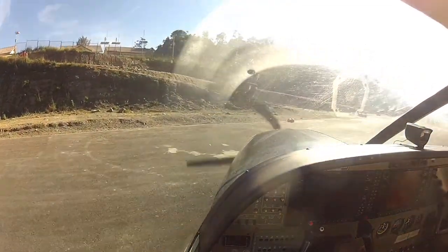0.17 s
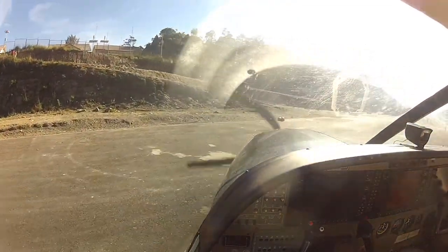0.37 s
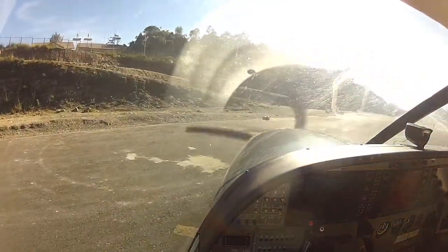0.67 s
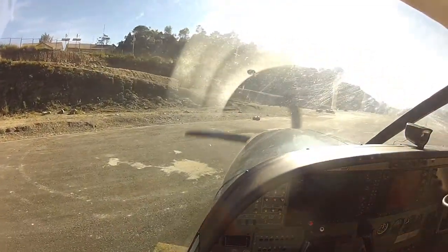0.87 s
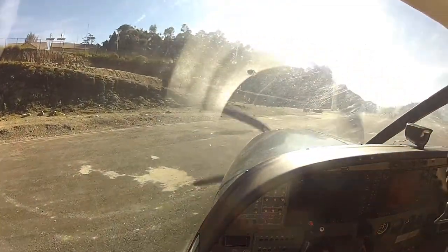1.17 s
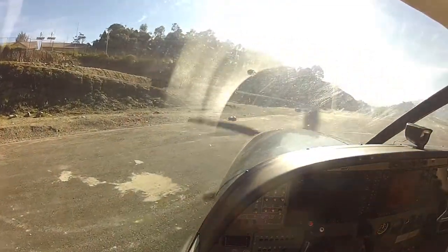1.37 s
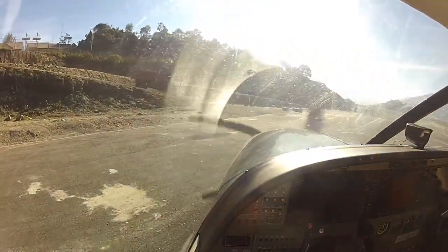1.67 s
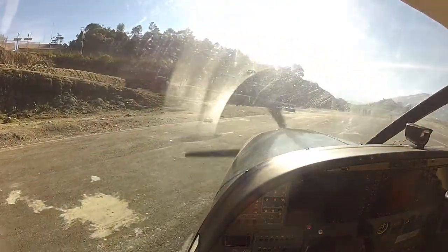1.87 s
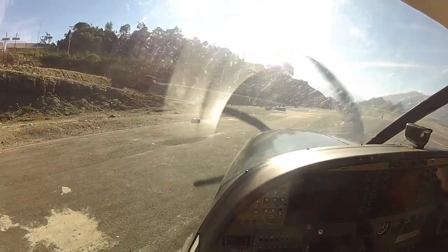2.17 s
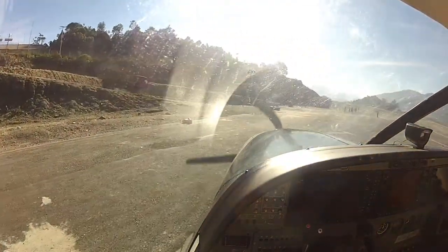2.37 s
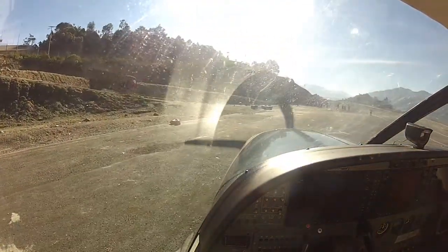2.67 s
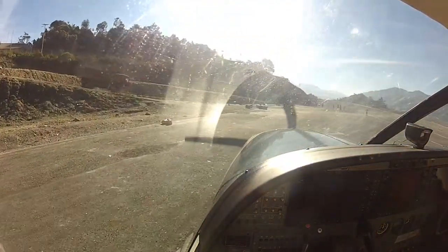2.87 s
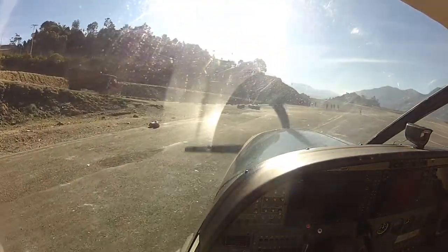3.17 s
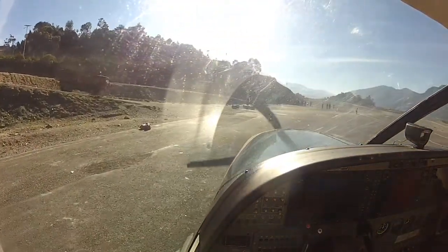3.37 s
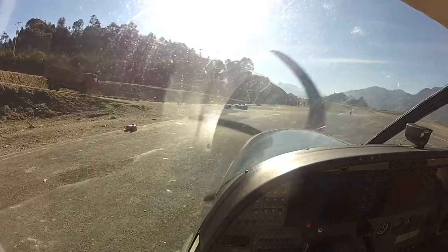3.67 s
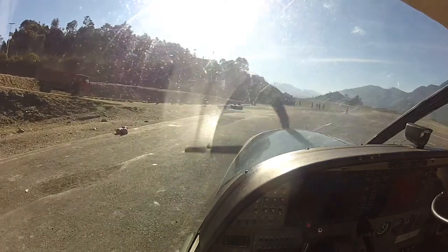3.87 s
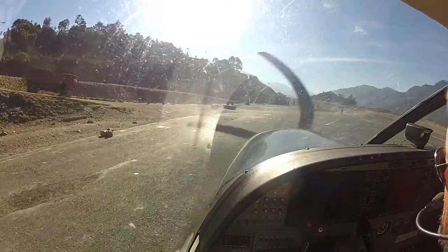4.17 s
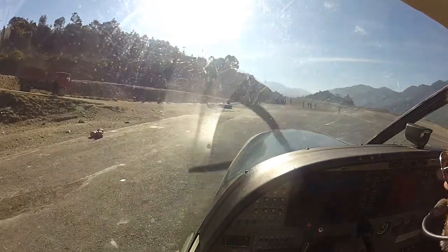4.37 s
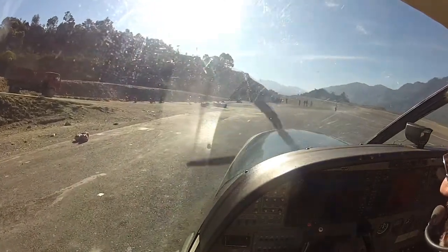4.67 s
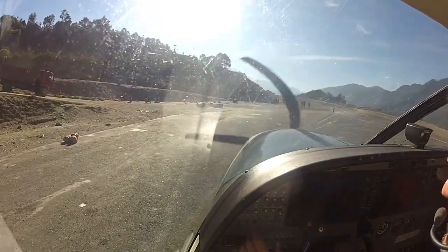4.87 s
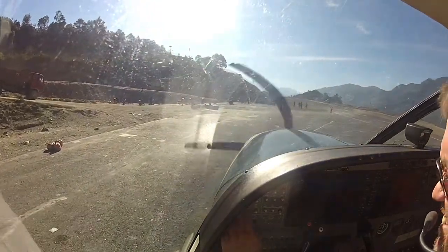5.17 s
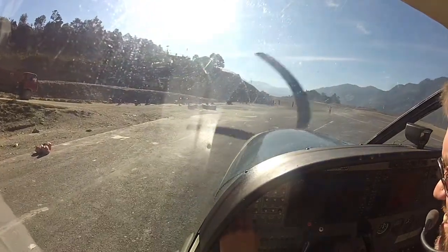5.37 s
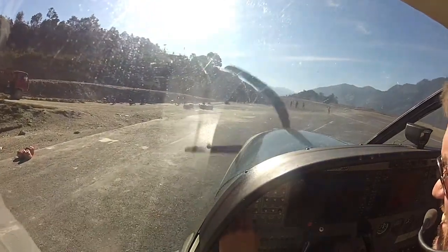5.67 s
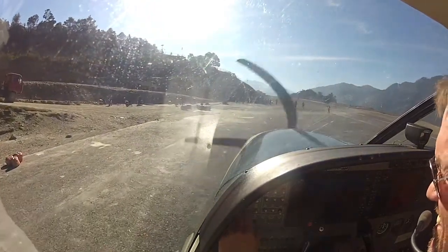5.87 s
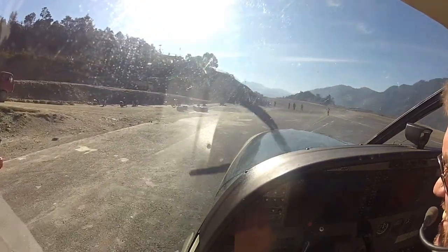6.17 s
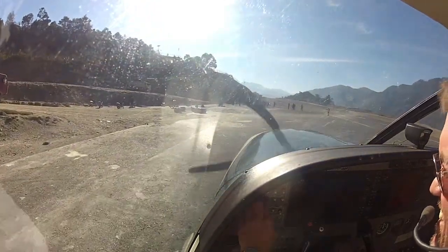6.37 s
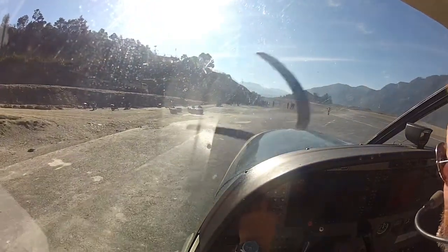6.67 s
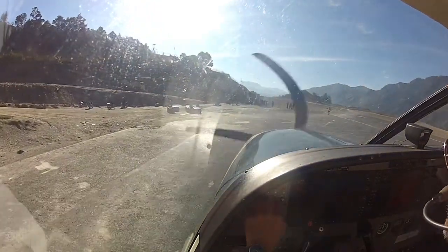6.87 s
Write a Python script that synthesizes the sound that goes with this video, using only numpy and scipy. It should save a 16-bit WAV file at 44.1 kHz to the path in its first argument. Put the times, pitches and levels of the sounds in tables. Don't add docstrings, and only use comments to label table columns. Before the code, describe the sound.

Turboprop engine heard from the cockpit: nasal whine and low beating thrum sink in pitch as power comes off, with roar continuing and faint panel ticks.

```python
import sys
import numpy as np
from scipy import signal
from scipy.io import wavfile
from scipy.ndimage import uniform_filter1d

SR = 44100
rng = np.random.default_rng(int(sys.argv[2]) if len(sys.argv) > 2 else 0)


def bounce(signal):
    frames = np.transpose(np.atleast_2d(signal))
    limited = np.clip(frames, -1, 1)
    pcm = np.round(limited * 32767).astype(np.int16)
    wavfile.write(sys.argv[1], SR, pcm)


def invert_db(level):
    return 10 ** (np.asarray(level, dtype=float) / 20)


N = 309582

# start_s, gear_mesh_hz, gas_generator_shaft_hz
ENGINE_SPEED = [(0, 2057.0, 395.05), (0.4, 2053.1, 394.9), (0.8, 2047.5, 394.89), (1.1, 2040.1, 391.93),
                (1.4, 2019.4, 383.62), (1.7, 1993.1, 376.19), (2, 1967.8, 369.55), (2.4, 1934.8, 362.01),
                (2.8, 1903.6, 356.13), (3.2, 1874.4, 351.75), (3.6, 1849.9, 348.6), (4, 1828.2, 346.67),
                (4.5, 1804.9, 345.17), (5, 1783.6, 344.27), (5.5, 1766.5, 343.67), (6, 1752.8, 343.26),
                (6.5, 1741.0, 343.09), (7.02, 1733.8, 343.15)]


def evened(x):
    return x / np.sqrt(np.mean(x ** 2))


def curves(rows, at):
    first, *columns = np.transpose(rows)
    return [np.interp(at, first, column) for column in columns]


def drift(rate_hz):
    steps = rng.standard_normal(N // 100 + 40)
    smooth = signal.filtfilt(*signal.butter(2, rate_hz, fs=SR / 100), steps)
    return np.interp(np.arange(N) / 100, np.arange(len(steps)), evened(smooth))


def turns_of(hz):
    return np.cumsum(hz) / SR


def tone(turns, db, waver_db, waver_turns, waver_hz=4.8):
    level = np.sqrt(2) * invert_db(db + waver_db * drift(waver_hz))
    return level * np.cos(2 * np.pi * (turns + waver_turns * drift(7.8)))


def swell_db(hz, resonances):
    power = 0
    for centre_hz, width_hz, db in resonances:
        power = power + invert_db(db) ** 2 / (1 + (2 * (hz - centre_hz) / width_hz) ** 2) ** 2
    return 10 * np.log10(power)


def loose_fittings():
    # start_s, peak_db
    knock_times = [
        (0.1276, -62),
        (1.1333, -44.5),
        (2.4882, -61),
        (5.0694, -55),
        (6.5216, -55),
        (6.5344, -57),
    ]
    # pitch_hz, level_db, decay_t60_s
    panel_modes = [(2890, 0, .03), (4550, 0, .025), (4830, 2.5, .02), (5080, -5, .02), (5370, 4, .015),
                   (5700, 0, .012)]
    rattles = rng.random(N) < 9 / SR
    knocks = rattles * invert_db(-73 + 3.0 * np.minimum(rng.exponential(1, N), 2.5))
    rebounds_s, rebound_loss_db = (0, .0037, .0088, .0165), np.array([2, 9, 10, 13])
    for start_s, db in knock_times:
        hits = [round((start_s + later) * SR) for later in rebounds_s]
        knocks[hits] = invert_db(db - rebound_loss_db)
    t = np.arange(3000) / SR
    ring = sum(invert_db(db - 60 * t / t60) * np.sin(2 * np.pi * hz * t) for hz, db, t60 in panel_modes)
    return signal.oaconvolve(knocks, ring)[:N]


def engine_mount():
    return tone(21.5 * np.arange(N) / SR, -53.5, 2, 0.015, 3.5)


def accessory_hum(mesh_hz):
    load = (mesh_hz - mesh_hz.min()) / np.ptp(mesh_hz)
    hum_hz = 75.6 - 2.6 * load
    return tone(turns_of(hum_hz), -50.5 - 3.5 * load, 0.98, 0.054)


def gas_generator(shaft_hz):
    shaft_orders = [1, 2, 4, .2928, 1.86, 3.135, 3.832]
    # centre_hz, width_hz, level_db
    shaft_swells = [
        [(395, 6, -53.5), (367, 40, -54.5), (344, 18, -50)],
        [(790, 10, -61), (725, 34, -50.5)],
        [(1580, 14, -57), (1470, 200, -64), (1378, 40, -48.5)],
        [(110.3, 8, -48.5), (105.1, 9.5, -52.5)],
        [(735, 5, -50)],
        [(1238, 30, -57), (1067, 98, -56)],
        [(1333, 50, -56)],
    ]
    # centre_hz, width_hz, level_db
    compressor_swells = [(5800, 120, -72), (5665, 140, -67.5), (5553, 83, -69.5), (5480, 40, -80)]
    turns = turns_of(shaft_hz)
    out = np.zeros(N)
    for order, swells in zip(shaft_orders, shaft_swells):
        out += tone(order * turns, swell_db(order * shaft_hz, swells), 1.0, 0.013, 3.1)
    blade_order = 15.966
    blade_db = swell_db(blade_order * shaft_hz, compressor_swells)
    return out + tone(blade_order * turns, blade_db, 1.8, .35)


def buffet(x, patchy_db=1.02, flicker_db=0.12, above_hz=1500):
    hz, _, z = signal.stft(x, SR, nperseg=512, noverlap=384)
    patches = rng.standard_normal(z.shape[::-1]).T
    flicker = evened(uniform_filter1d(patches.mean(0), size=6))
    patches = uniform_filter1d(patches, size=5, axis=0)
    patches = evened(uniform_filter1d(patches, size=16, axis=1))
    share = (hz ** 2 / (hz ** 2 + above_hz ** 2))[:, None]
    gain = invert_db(share * (patchy_db * patches + flicker_db * flicker))
    return signal.istft(z * gain, nperseg=512, noverlap=384)[1][:N]


def roar(size=8192):
    # centre_hz,
    # width_hz, idle_level_db, change_at_power_db
    cabin_and_housing = [(111, 33, -4.5, -4), (130.5, 28, -9.5, 7), (184, 51, 0.2, -2.5), (191.2, 42, 0.96, 2.5),
                         (232.6, 31, 0, -4), (253.6, 36.6, 4, -0.8), (290, 76, -7.5, 3), (336, 33, -4.5, -1.5),
                         (411, 90, -10, 2.5), (458.4, 55, -9, 1.8), (501, 38, -10.5, -6), (564, 112, -14.5, 2.5),
                         (734, 82, -10.5, 0.5), (796, 40.0, -22.5, 7.5), (920, 78, -20.5, 3.5), (1039.0, 40, -15.5, -6),
                         (1072, 48, -10.5, 2), (1142, 73, -7.5, 3.5), (1227, 72, -2, 2), (1264, 80, -3.5, 3.5),
                         (1394, 170, -14.5, 1.5), (1571, 120, -15.5, 0), (1643, 52, -17.5, 2), (1783, 96, -11, 0.3),
                         (1888, 95, -9, -3), (1985, 62, -5, -1),
                         (2082, 125, -9.5, 0.5), (2137, 160, -4, -13), (2253, 61, 1.6, -4), (2320, 42, -5, 1.5),
                           (2352, 92, -1.5, -7), (2440, 31, -1, -6), (2506, 75, -5.5, -7.5), (2620, 105.0, -21, -1),
                           (2625, 93, -14.5, -4.5), (2770, 63, -19, -11), (2830, 81, -20.5, -7),
                           (2995, 117.0, -25.5, -1.7), (3020, 42, -23.5, -11), (3165, 113, -18.5, -5),
                           (3300, 80, -21.5, 5), (3310, 79, -19.5, -8.5), (3370, 102.0, -22.5, -5), (3522, 51, -16, 2),
                           (3610, 150, -19, 3), (3761, 118, -8.5, 5.5), (3860, 154, -16.5, 3), (4000, 190, -22.5, 5),
                           (4310, 293.0, -31.5, 2), (4465, 380, -32.5, 1), (4760, 170, -37, 1),
                           (5240, 530, -38.5, -0.5), (5540, 220, -36, -2.9), (5730, 450, -42, -0.5)]
    # centre_hz, width_hz, idle_level_db, change_at_power_db
    airframe = [(22, 8, -9, 0), (44, 10, -4, 0), (67, 18, -9, -2), (78, 5, -14, 14)]
    # start_s, level_db
    roar_level = [(0, -34), (1.0, -33.5), (1.1, -34.5), (1.5, -34.5), (2.7, -34.5), (7.02, -35)]
    hop = size // 8
    frames, hz = N // hop + 9, np.fft.rfftfreq(size, 1 / SR)
    start_s, _, shaft = np.transpose(ENGINE_SPEED)
    power = np.interp(np.arange(frames) * hop / SR, start_s, (shaft - shaft.min()) / np.ptp(shaft))
    centre, width, db, change_db = np.transpose(cabin_and_housing + airframe)[:, :, None]
    shape = (1 + (2 * (hz[:, None] - centre.T) / width.T) ** 2) ** -2
    magnitude = np.sqrt(shape @ invert_db(db + change_db * power) ** 2)
    a, b = rng.standard_normal((frames, len(hz), 2)).T
    noise = signal.istft((a + 1j * b) * magnitude, nperseg=size, noverlap=size - hop)[1][:N]
    level_db = curves(roar_level, np.arange(N) / SR)[0] + 2.5
    return invert_db(level_db) * buffet(evened(noise))


def propeller_and_gears(mesh_hz):
    mesh_orders = [.03156, .034282, .0947, 1, .0261, .0896, .092, .1828, 1.0522]
    # centre_hz, width_hz, level_db
    mesh_swells = [
        [(64.5, 3.4, -38.5), (60, 4, -42), (55.4, 5, -50.5)],
        [(68.5, 7.8, -36), (66.1, 4, -41)],
        [(192.5, 7.4, -41), (187.5, 3, -43), (176.8, 2.1, -44.5), (175.5, 5.5, -47.5)],
        [(2053, 16, -39.6), (1994, 28, -36), (1968, 36, -40.5), (1900, 25, -44.5), (1862, 35, -46),
         (1780, 25, -45.5), (1748, 35, -44.5)],
        [(49.5, 3, -55.5)],
        [(184.3, 3.2, -44.5), (178.1, 2.5, -39)],
        [(186.6, 3, -48), (177, 3, -41), (167, 40, -58)],
        [(373, 13, -49.5), (323, 29, -57.5)],
        [(2170, 50, -46), (1950, 200, -60)],
    ]
    # mesh_hz, phase_turns
    throb_lag = [(1850, -.27), (1960, -.21), (2045, -.41)]
    turns = turns_of(mesh_hz)
    levels = [swell_db(order * mesh_hz, swells) for order, swells in zip(mesh_orders, mesh_swells)]
    blade_db, neighbour_db, third_db, gear_db, *faint_db = levels
    out = tone(mesh_orders[0] * turns, blade_db, .3, .006)
    out += tone(mesh_orders[1] * turns + curves(throb_lag, mesh_hz)[0], neighbour_db, .3, .006)
    out += tone(mesh_orders[2] * turns, third_db, 3.7, 0.022)
    out += tone(turns, gear_db, 0.32, 0.029)
    for order, db in zip(mesh_orders[4:], faint_db):
        out += tone(order * turns, db, 1.1, 0.052)
    return out


def scene():
    mesh_hz, shaft_hz = curves(ENGINE_SPEED, np.arange(N) / SR)
    background = loose_fittings() + engine_mount() + accessory_hum(mesh_hz)
    engine = gas_generator(shaft_hz) + roar() + propeller_and_gears(mesh_hz)
    return (background + engine)[None]


def low_pass(x):
    return signal.sosfilt(signal.butter(12, 15680, fs=SR, output="sos"), x)


def record(dry):
    alias_guard = signal.firwin(301, 6010, fs=SR)
    guarded = signal.oaconvolve(dry, alias_guard[None], "same")
    slow = signal.resample_poly(guarded, 40, 147, axis=1, window=("kaiser", 8.0))
    held = np.repeat(slow, 4, axis=1)
    held = signal.resample_poly(held, 147, 160, axis=1)[:, :N]
    edge = signal.firwin(1501, 15310, window=("kaiser", 9), fs=SR)
    return low_pass(signal.oaconvolve(held, edge[None], "same"))


dry = scene()
out = record(dry)
bounce(out)
```